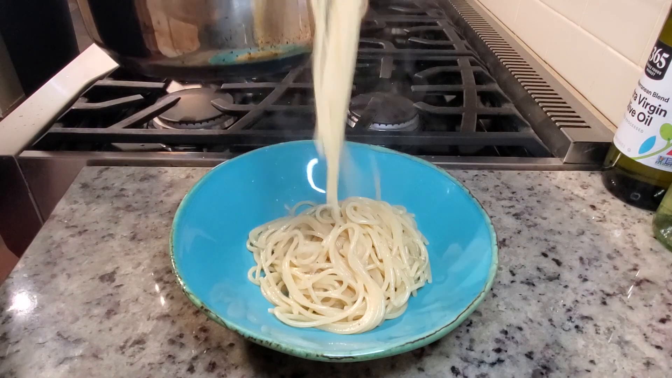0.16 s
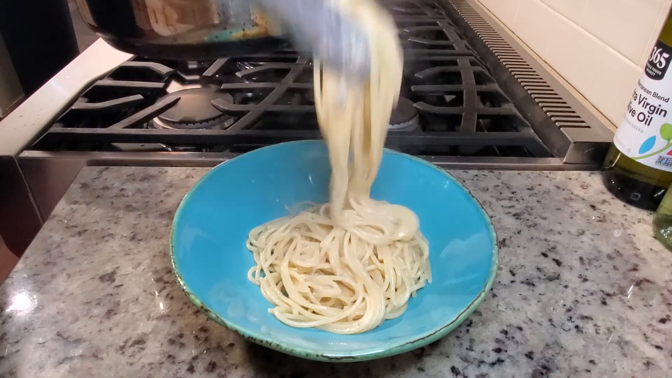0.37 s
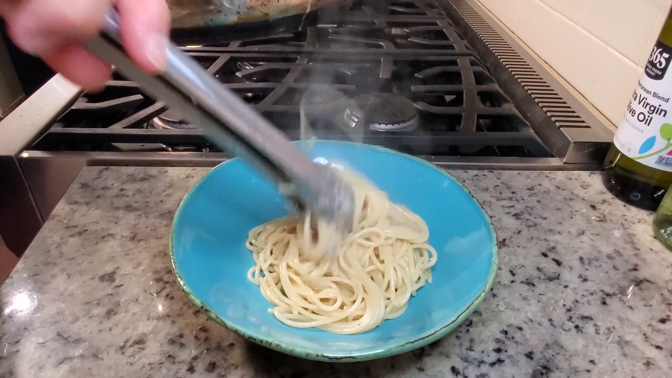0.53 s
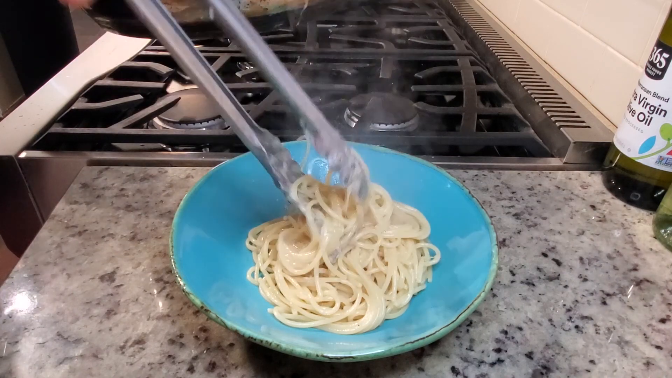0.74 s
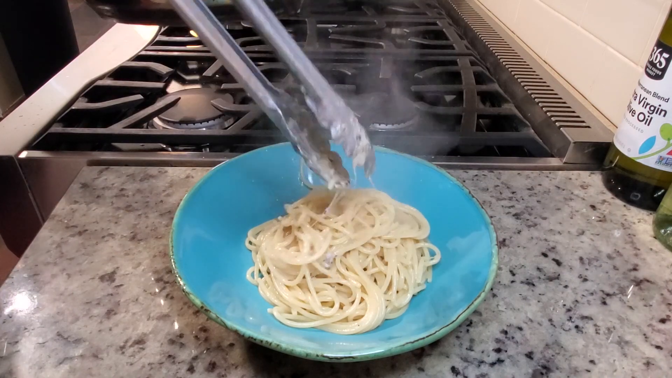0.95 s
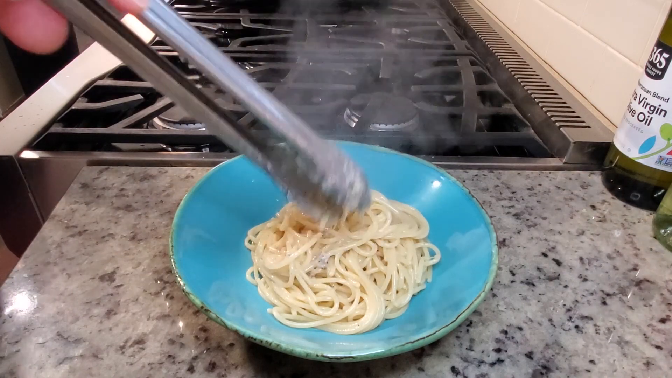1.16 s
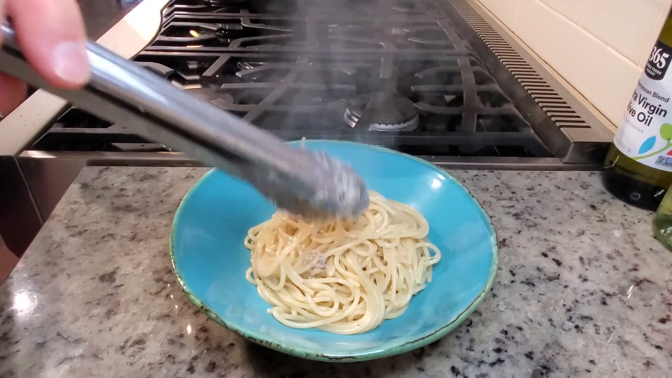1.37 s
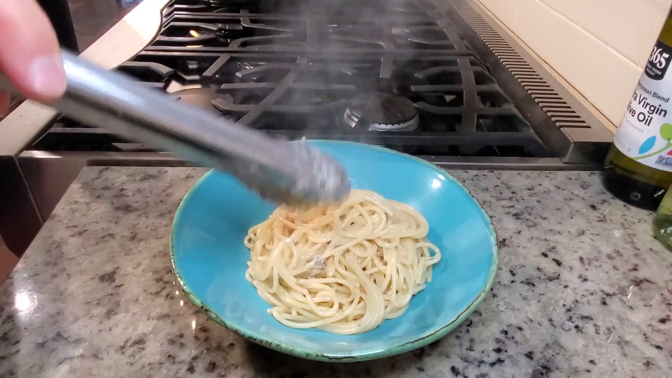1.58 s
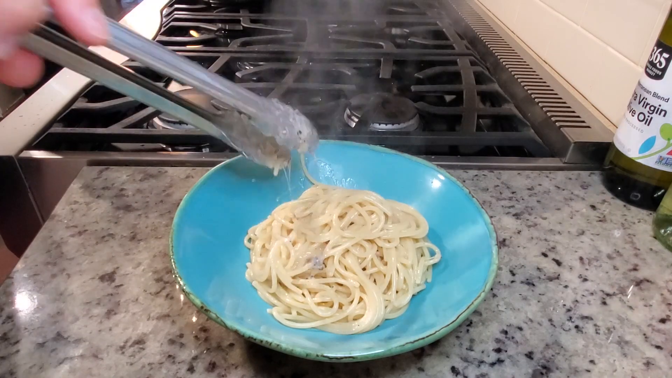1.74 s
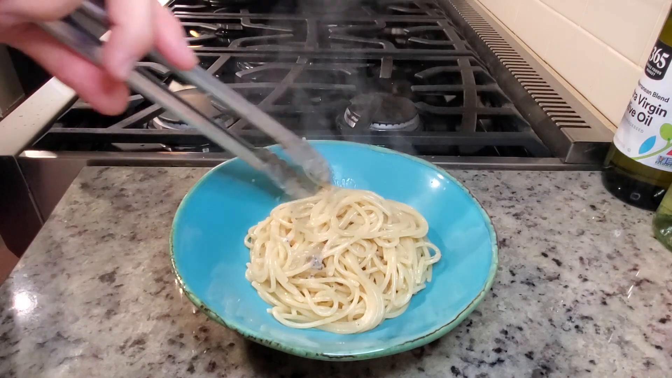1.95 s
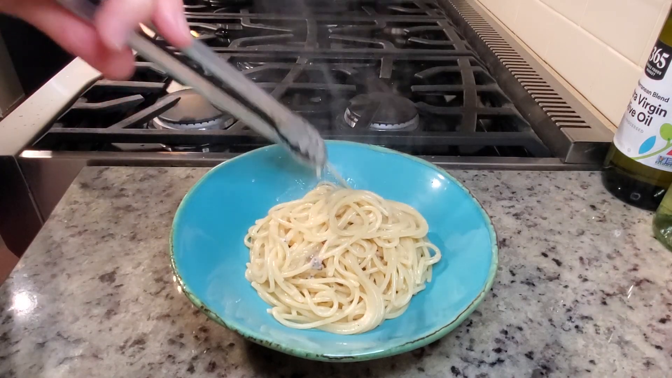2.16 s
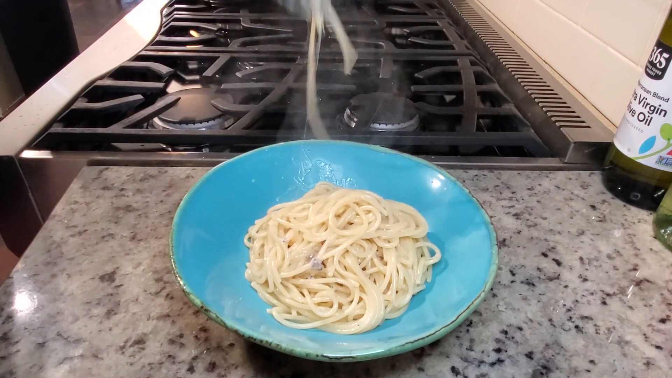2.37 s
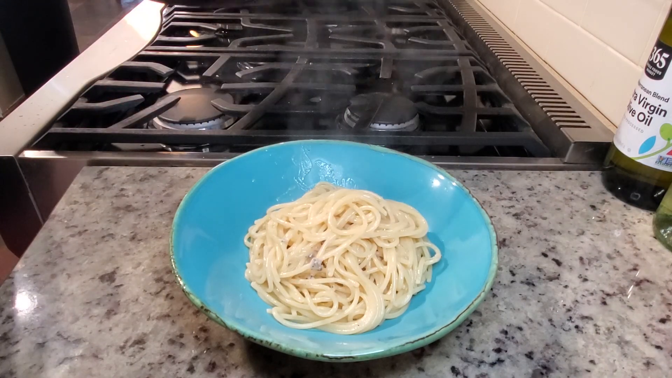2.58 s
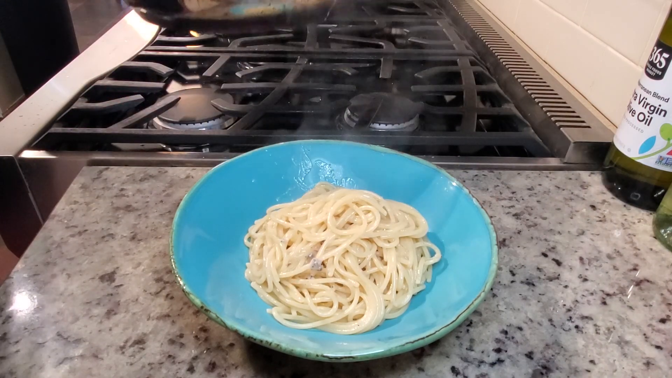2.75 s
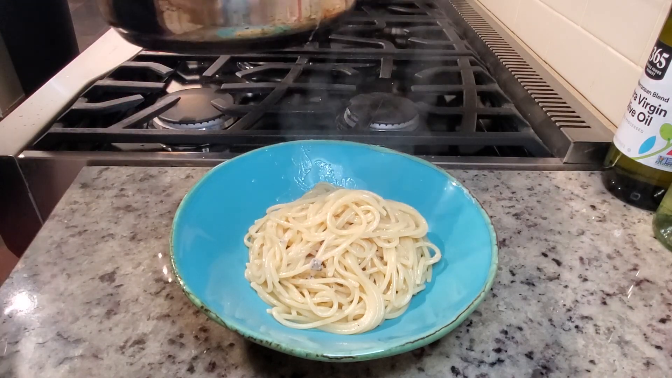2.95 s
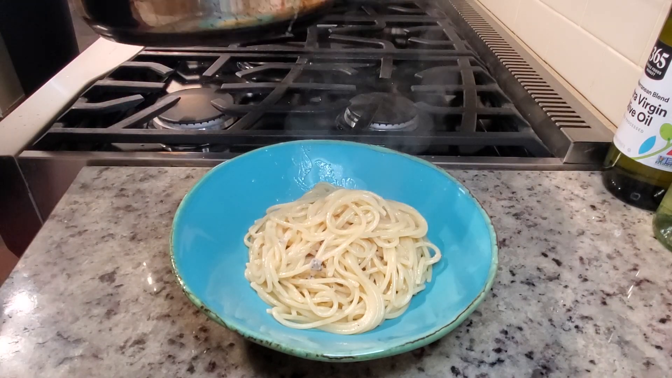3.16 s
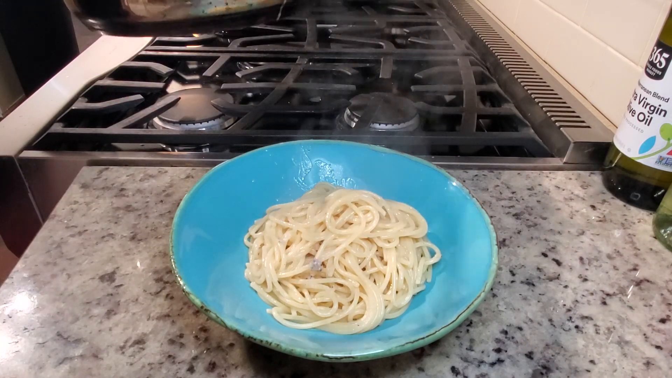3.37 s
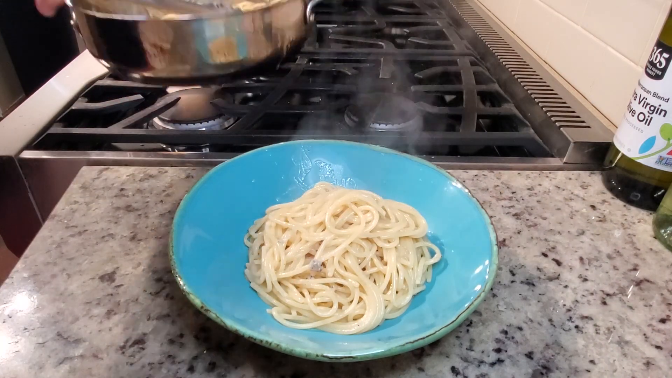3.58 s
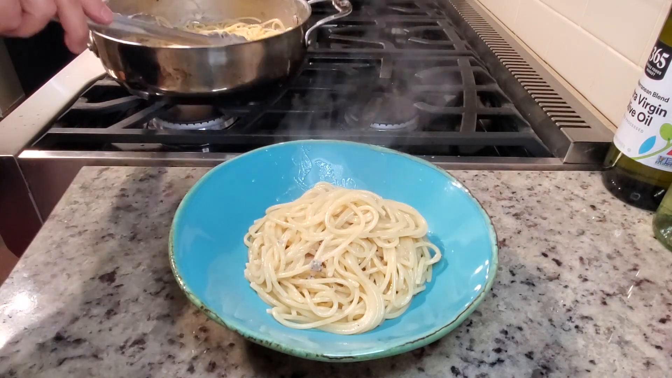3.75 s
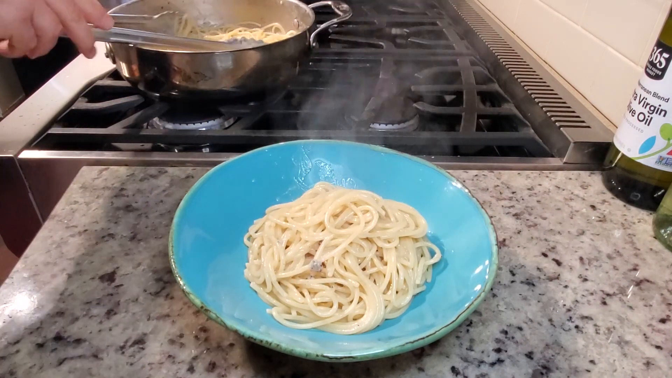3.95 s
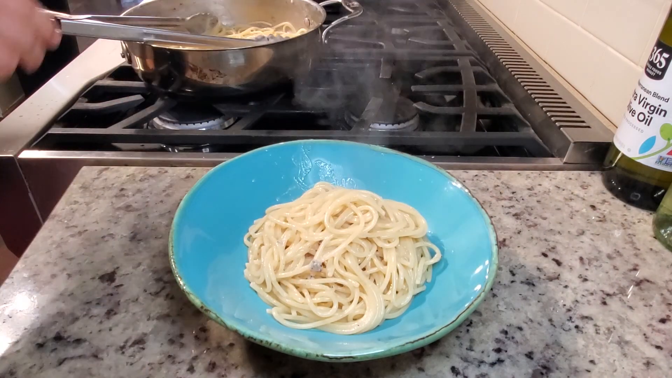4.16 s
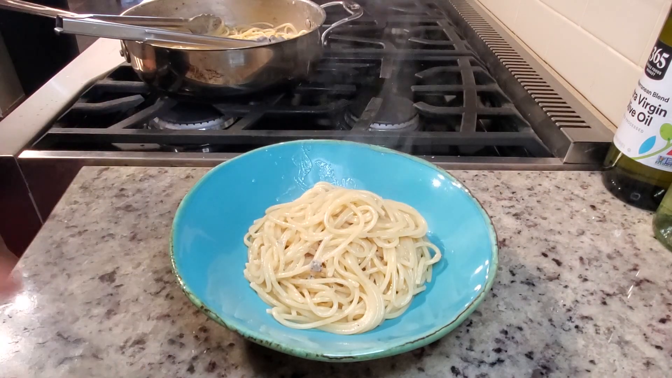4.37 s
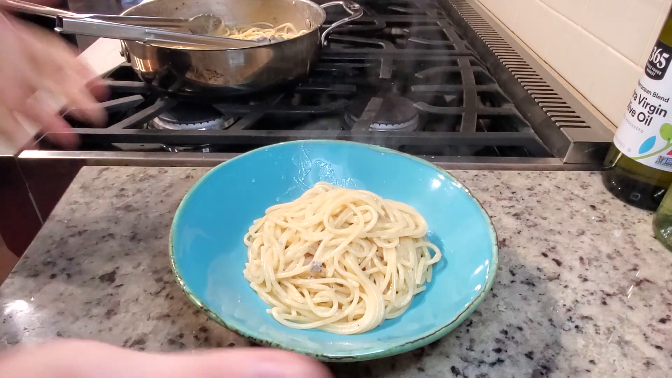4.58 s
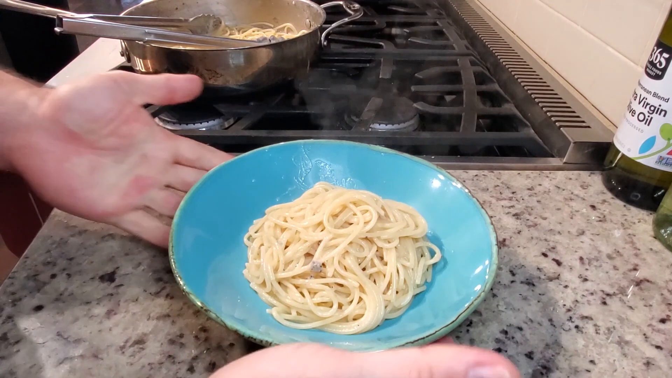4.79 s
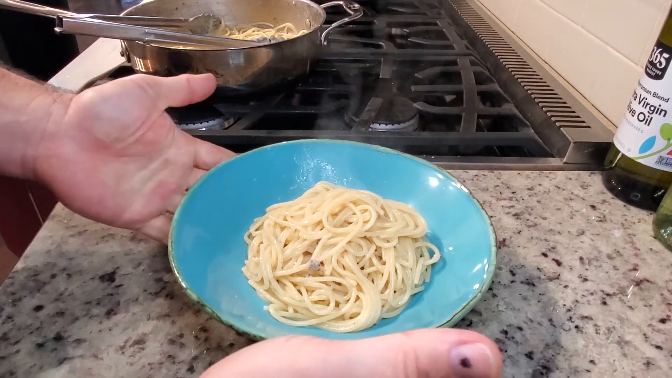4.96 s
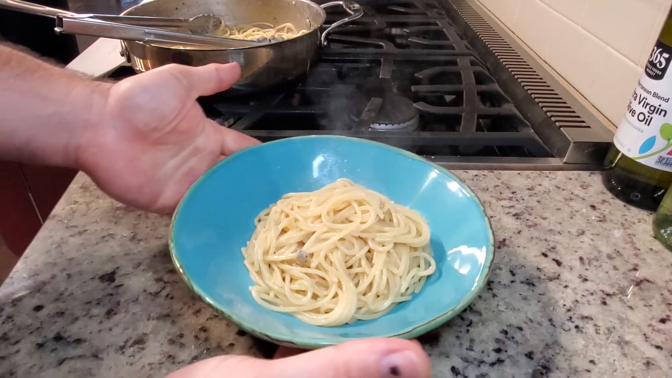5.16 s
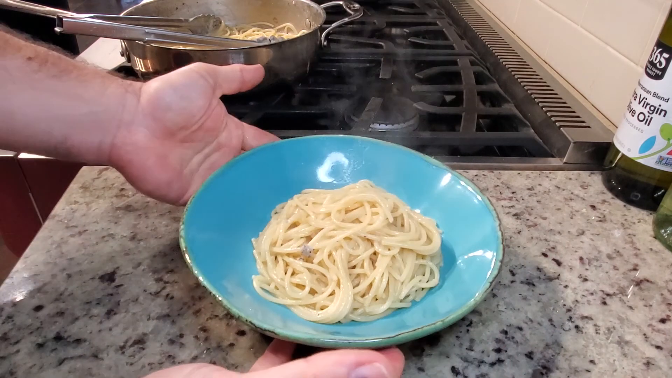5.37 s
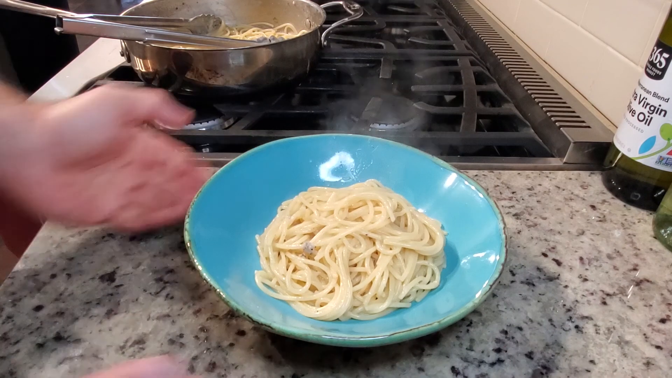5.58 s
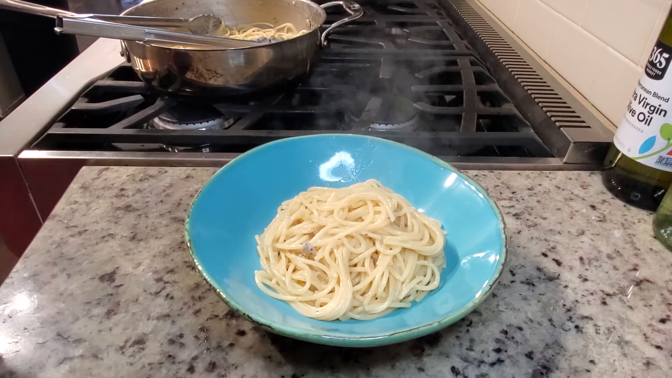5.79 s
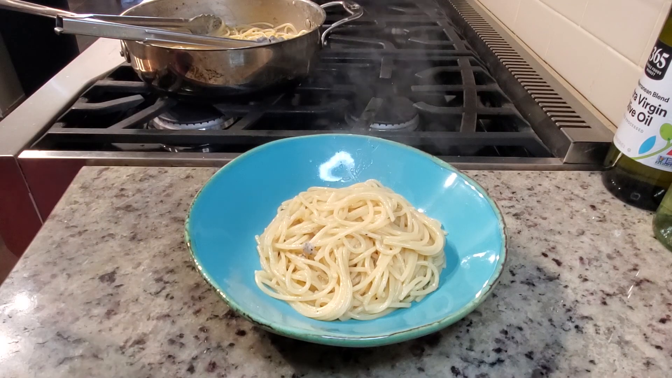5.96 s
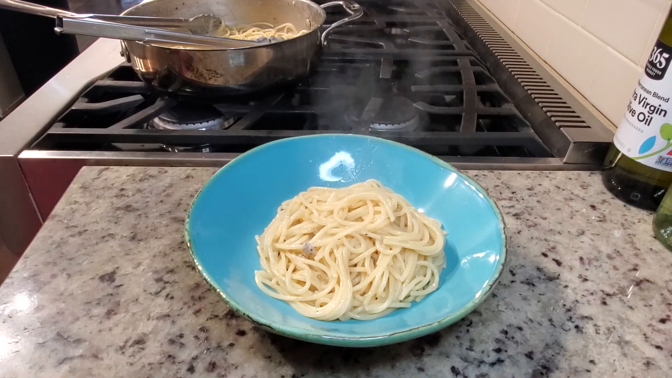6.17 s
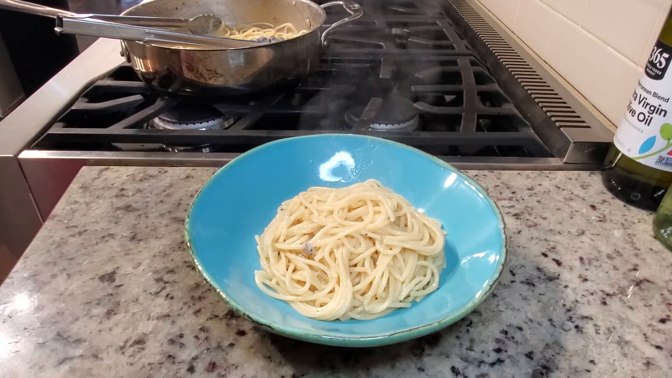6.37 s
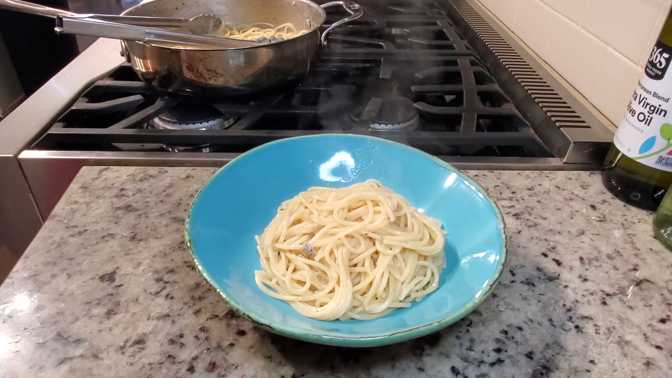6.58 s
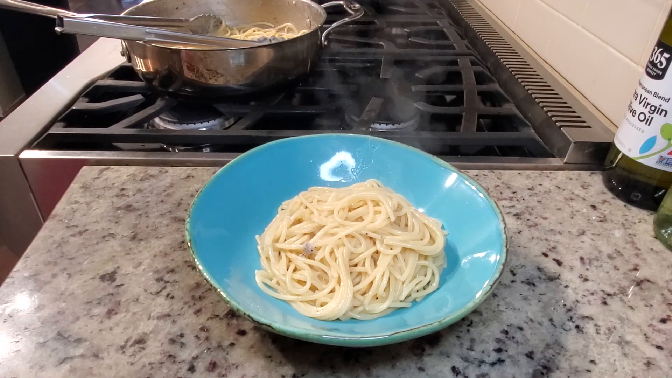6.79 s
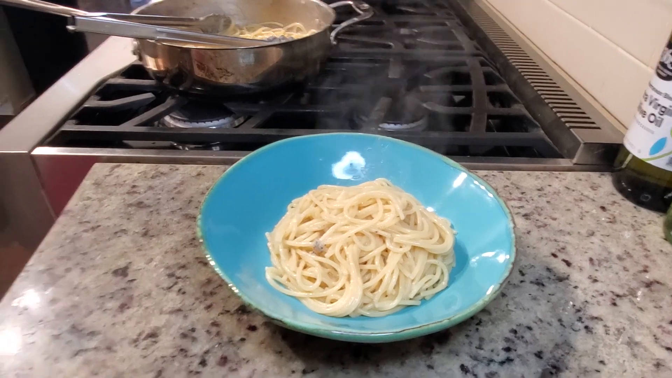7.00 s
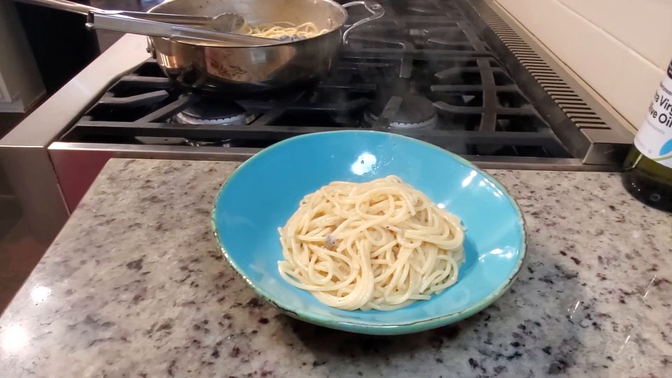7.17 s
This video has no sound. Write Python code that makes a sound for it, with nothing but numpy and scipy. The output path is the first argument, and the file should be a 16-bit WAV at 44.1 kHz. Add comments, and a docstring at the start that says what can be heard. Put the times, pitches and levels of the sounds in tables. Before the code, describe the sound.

A low, airy fan rumble with faint wavering motor tones runs throughout an indoor kitchen with short reverberation. Around 0.4-0.6 s, light metallic ticks and wet strand crackles lead to a soft plop of pasta in a ceramic bowl; faint scuffs follow at 1.3-1.65 s. At 1.9 s tongs touch the bowl dully, hiss briefly on the rim, then at 2.03 s strike a bright, beating ceramic chime that dies quickly. Only hum remains until 3.4 s, when tongs drop into a steel skillet with a sharp clank at 3.49 s and smaller rattles at 3.7-3.8 s. From 3.85 to 4.1 s the skillet clangs and rocks onto an iron grate, crunchy and booming, with dull settling thumps until 4.25 s. Light knocks at 4.9 s precede a gritty, resonant bowl scrape, 5.0-5.5 s, rising slightly in pitch. Faint hisses, a soft tick at 6.3 s and muffled handling bumps at 6.7-6.95 s finish.

```python
"""Steel tongs serve spaghetti in a kitchen: they tick, knock on a ceramic bowl and drop into a steel skillet.
Struck bodies sound as sums of decaying modes (the bowl's in beating pairs), contacts as short noise bursts.
The skillet rocks to rest on an iron grate. Wet strands are crackles; the bowl turning on stone is resonant
noise of drifting pitch. Faint soft hisses and bumps come late; a fan hums throughout as noise and tones."""
import sys
import numpy as np
from scipy import signal
from scipy.fft import rfft, irfft, next_fast_len
from scipy.io import wavfile
from scipy.ndimage import map_coordinates

SR = 44100
rng = np.random.default_rng(int(sys.argv[2]) if len(sys.argv) > 2 else 0)


def persist_wave(psi):
    """Save psi, clipped to +-1, as 16-bit WAV."""
    counts = np.round(np.clip(psi, -1, 1) * 32767).astype(np.int16)
    wavfile.write(sys.argv[1], SR, np.atleast_2d(counts).T)


N = 318843  # length in samples
T = np.arange(SR) / SR  # time since a blow, s


def amp(db):
    """Logarithmic scale: decibels to amplitude gain."""
    return 10 ** (np.asarray(db) / 20)


def unit(x):
    """Normalisation: scale to rms 1."""
    return x / np.sqrt(np.mean(x ** 2) + 1e-20)


def along(points, hz):
    """Spectral envelope: (f/Hz, value) points joined on a logarithmic frequency axis."""
    f, v = np.transpose(points)
    return np.interp(np.log(hz + 1), np.log(f + 1), v)


def level(rows):
    """Amplitude envelope: gain per sample from (t/s, level/dB) rows."""
    return amp(np.interp(np.arange(N) / SR, *np.transpose(rows)))


def wobble(rate):
    """Random modulation: a smooth curve through normal deviates, rate knots a second."""
    knots = rng.standard_normal(int(N * rate / SR) + 4)
    return map_coordinates(knots, [np.arange(N) * rate / SR])


def swell(t, start, hold, rise, fall):
    """Exponential growth and decay: gain of a stroke at times t; rise and fall are the times for 20 dB."""
    before = np.maximum(start - t, 0)
    after = np.maximum(t - start - hold, 0)
    return amp(-20 * (before / rise + after / fall))


def filtered(x, response):
    """Linear filtering: the spectrum of x times a response of frequency."""
    m = next_fast_len(len(x) + 8192)
    return irfft(rfft(x, m) * response(np.fft.rfftfreq(m, 1 / SR)), m)[:len(x)]


def noise(colour, size):
    """Coloured noise: rms 1, with spectral level colour(Hz) in dB."""
    return unit(filtered(rng.standard_normal(size), lambda hz: amp(colour(hz))))


def octaves(hz, centre_hz=2500):
    """Logarithmic pitch: distance from a centre in octaves."""
    return np.log2((hz + 1) / centre_hz)


def add(track, s, sound):
    """Superposition: mix a sound into the track at time s."""
    i = round(s * SR)
    track[i:i + len(sound)] += sound[:N - i]


# the kitchen's reverberation time: (f/Hz, t60/s)
KITCHEN_DECAY = [(100, .45), (700, 0.54), (2000, .48), (5000, .39), (8000, 0.35), (14000, .22)]


def room_tail():
    """Diffuse reverberation: the answer to one blow is decaying noise whose treble dies first."""
    hz, t, z = signal.stft(rng.standard_normal(SR), SR, nperseg=256)
    decay = amp(-60 * t / along(KITCHEN_DECAY, hz)[:, None])
    tail = signal.istft(z * decay, SR, nperseg=256)[1][:SR]
    tail = tail * (1 - np.exp(-T / .006))
    return tail / np.linalg.norm(tail)


def in_room(sound, room_db):
    """Convolution: a sound together with its reverberation."""
    return sound + amp(room_db) * signal.fftconvolve(sound, room_tail())[:SR]


CONTACT_S = 0.00017  # time constant with which a contact builds up


def burst(colour, t60, room_db, crack=1):
    """Impact excitation: a sharp crack and dense, short-lived vibration, heard in the room."""
    size = SR // 3
    t = T[:size]
    decay = amp(-60 * t / t60) + crack * amp(-60 * t / 0.016)
    envelope = decay * (1 - np.exp(-t / CONTACT_S))
    return in_room(np.pad(noise(colour, size=size) * envelope, (0, SR - size)), room_db)


def ring(modes, tilt=0, scatter_db=2, cycles=1, blur=0.28, early=0):
    """Modal superposition: modes swell and decay; loose contact blurs phase and damps early wide swings."""
    out = np.zeros(SR)
    for hz, db, t60 in modes:
        drift = blur * np.cumsum(rng.standard_normal(SR)) / 100
        phase = 2 * np.pi * (hz * T + rng.random()) + drift
        fade_db = -60 * T / min(t60, .5)  # no mode outlasts a t60 of 0.5 s
        rise = 1 - np.exp(-T * hz / cycles)
        gain = amp(db + tilt * octaves(hz) + scatter_db * rng.normal() + fade_db)
        out += gain * rise * np.sin(phase)
    return out * (1 + early * np.exp(-T / 0.015))


def tick(centre_hz, width, t60):
    """Band-limited impact: a light contact in one band, width octaves to each side."""
    def band(hz):
        return -10 * np.log10(1 + (octaves(hz, centre_hz) / width) ** 6)
    return amp(-5) * burst(band, t60, room_db=-11.5, crack=0.55)


# relative level of the whole hum: (t/s, level/dB)
FAN_LEVEL = [(0.0, -41), (2.09, -41.5), (2.39, -44.5), (2.96, -45.5), (4.05, -38.5), (4.87, -46),
             (5.78, -41.5), (7.23, -40)]
# spectrum of the moving air: (f/Hz, relative level/dB)
AIR_SPECTRUM = [(20, -33.5), (38, -15), (50, -7), (72, -7), (98, -3.5), (128, -12.5), (180, -11),
                (275, -29.5), (370, -25), (480, -33.5), (620, -42), (1200, -52), (4500, -66.5),
                (15000, -79.5)]
# motor tones: (f/Hz, relative level/dB, wander rate/s^-1)
MOTOR_TONES = [(52, -41.5, 5.5), (95.7, -49.5, 5.6), (145.7, -55, 5.4), (198.4, -51, 2.7), (387, -62, 1.5),
               (471, -69, 4), (591, -88, 0.54), (790, -75.5, 1.6)]


def fan():
    """Broadband flow noise with discrete tones: a rumble of air and wavering motor tones."""
    t = np.arange(N) / SR
    rumble = amp(-2.0) * noise(lambda hz: along(AIR_SPECTRUM, hz), size=N)
    tones = np.zeros(N)
    for hz, db, rate in MOTOR_TONES:
        gain = amp(db + 0.5 * wobble(rate)) * np.sqrt(2)
        tones += gain * np.sin(2 * np.pi * hz * t + 1.2 * wobble(rate))
    strength = unit(level(FAN_LEVEL))
    return strength * (amp(-38.5) * rumble + amp(-1.5) * tones)


# light ticks and scuffs of the tongs and of handling:
# (t/s, relative level/dB, centre f/Hz, width to each side/octaves, t60/s)
LIGHT_TICKS = [(.360, -45.5, 3840, 0.22, .045), (.560, -48, 4500, 0.21, 0.12),
               (.5928, -43.5, 3800, 0.25, 0.032), (1.283, -54, 5200, .55, .07),
               (1.538, -53, 5300, .7, 0.039), (1.643, -59, 5090, .6, 0.075), (5.540, -60, 8050, 0.28, .08),
               (6.208, -66, 6040, .15, 0.2), (6.284, -46.5, 2610, .65, .33), (6.928, -46, 3620, 0.37, 0.1)]


def light_ticks():
    """Band-limited impacts: light ticks and scuffs of the tongs and of handling."""
    out = np.zeros(N)
    for s, db, centre_hz, width, t60 in LIGHT_TICKS:
        add(out, s, amp(db) * tick(centre_hz, width, t60))
    return out


# crackles grow louder until the tongful lands; their level rises 10 dB in the rise, falls 20 dB in the fall
PASTA_LANDS_S, PASTA_RISE_S, PASTA_FALL_S, PASTA_DB = .565, 0.11, 0.093, -59
STRANDS_PER_S, STRAND_HZ, STRAND_SPREAD_OCT, STRAND_SCATTER_DB = 90, 4470, 0.37, 1.5
PLOP_DB, PLOP_HZ, PLOP_LEAD_S = -53.5, 1690, 0.021  # the soft landing, just ahead of the bowl's answer
SOFT_RING_DB, SOFT_TILT = -52.5, -0.5  # tilt in dB per octave


def pasta(count=2):
    """Granular impacts: strands crackle off the tongs; the plop wakes only the bowl's lowest modes."""
    out = np.zeros(N)
    length = PASTA_RISE_S + PASTA_FALL_S
    times = PASTA_LANDS_S - PASTA_RISE_S + np.arange(0, length, 1 / STRANDS_PER_S)
    for s, (late, size, pitch) in zip(times, rng.standard_normal((len(times), 3))):
        stroke = swell(s, PASTA_LANDS_S, 0, 2 * PASTA_RISE_S, PASTA_FALL_S)
        gain = amp(PASTA_DB + STRAND_SCATTER_DB * size) * stroke
        centre_hz = STRAND_HZ * 2 ** (STRAND_SPREAD_OCT * pitch)
        add(out, s + 0.33 * late / STRANDS_PER_S, gain * tick(centre_hz, width=0.24, t60=0.059))
    add(out, PASTA_LANDS_S - PLOP_LEAD_S, amp(PLOP_DB) * tick(PLOP_HZ, width=1.0, t60=0.24))
    low_modes = [mode[:3] for mode in BOWL_MODES[:count]]
    add(out, PASTA_LANDS_S, amp(SOFT_RING_DB) * ring(low_modes, SOFT_TILT, cycles=6))
    return out


# the bowl's paired modes: (f/Hz, relative level/dB, t60/s, split/Hz, share of the partner)
BOWL_MODES = [(791, -17, .3, 14, .4), (1313, -6, .45, 22, .7), (2071, 0, .5, 6.2, -.8),
              (3001, -5, .5, 9, .35), (4085, -2, .42, 12, .7), (5120, -23, .3, 20, .4),
              (5383, -20, .3, 25, .4), (6331, -27, .32, 11, .4), (6616, -28, .32, 13, .4),
              (7020, -28, .3, 19, .4), (7510, -25, .32, 17, .4), (8608, -29, .27, 21, .4),
              (10080, -30, .26, 6, .3)]


def bowl_chime():
    """Broken symmetry: the bowl is not quite round, so each mode is a beating pair."""
    chime = np.zeros(SR)
    for hz, db, t60, split, share in BOWL_MODES:
        pair = np.sin(2 * np.pi * hz * T) + share * np.sin(2 * np.pi * (hz + split) * T)
        chime += amp(db - 60 * T / t60) * pair
    return chime


# tongs on the bowl:
# (t/s, relative level/dB, relative ring level/dB, thud level/dB, brightness of the chink/dB per octave)
BOWL_KNOCKS = [(1.9152, -30, -4, 3, -4.5), (2.0324, -13.5, 3, -16, 1.5), (2.037, -22, -29, -16.5, -1.5)]
# steel meeting glaze: (f/Hz, relative level/dB)
CHINK_SPECTRUM = [(200, -15), (550, -19), (780, -0.5), (1050, -10), (1400, -0.5), (2500, -4), (4200, -4.5),
                  (5500, -8), (7500, -16.5), (10000, -30), (12500, -42), (15800, -47)]
# the stone top under the bowl: (f/Hz, relative level/dB, t60/s)
COUNTER_MODES = [(125, -2.5, 0.14), (153, -1, .22), (207.7, -3.5, 0.16), (280, -3.5, 0.11), (374, -4, 0.16),
                 (490, -12, .15), (720, -6, 0.23), (794, -4, 0.15)]


def bowl():
    """Impact and modal response: each blow gives a chink, the bowl's chime and a thud of the counter."""
    out = np.zeros(N)
    chime = bowl_chime()
    for s, db, ring_db, thud_db, tilt in BOWL_KNOCKS:
        chink = burst(lambda hz: along(CHINK_SPECTRUM, hz) + tilt * octaves(hz),
                      t60=0.087, room_db=-8.5, crack=0.92)
        ringing = in_room(chime, room_db=-14)
        thud = ring(COUNTER_MODES, cycles=.6)
        add(out, s, amp(db) * (amp(-0.5) * chink + amp(ring_db - 3) * ringing + amp(thud_db) * thud))
    return out


# the tongs drag on the rim between the knocks; edge is the time for 20 dB
DRAG_S, DRAG_LENGTH_S, DRAG_DB, DRAG_EDGE_S = 1.96, 0.023, -52, .045
# hiss of steel on glaze: (f/Hz, relative level/dB)
DRAG_SPECTRUM = [(1000, -20.5), (4000, -8), (5200, -1), (6200, -7.5), (8700, -10), (11600, -18.5),
                 (12500, -45.5)]


def rim_drag():
    """Sliding friction: steel hisses over the glaze of the rim as modulated noise."""
    hiss = unit(noise(lambda hz: along(DRAG_SPECTRUM, hz), size=N) * amp(2.5 * wobble(150)))
    return amp(DRAG_DB) * hiss * swell(np.arange(N) / SR, DRAG_S, DRAG_LENGTH_S, DRAG_EDGE_S, DRAG_EDGE_S)


# tongs in the skillet: (t/s, relative level/dB, relative ring level/dB, brightness/dB per octave)
TONG_BLOWS = [(3.4212, -34, -4.5, 6), (3.4887, -16.5, -4.5, 1.5), (3.4915, -9.5, -6.5, -0.5),
              (3.712, -23.5, -3.5, 0), (3.72, -27, 0.5, 1), (3.8122, -39.5, 5, 2)]
# the skillet with the tongs in it: (f/Hz, relative level/dB, t60/s before the cap in ring)
SKILLET_MODES = [(298.2, -9, 0.95), (487, -18.5, 0.55), (970, -10.5, .25), (1110, -6.5, 0.11),
                 (1738, -11, .52), (1830, -15, 0.3), (2036, -18, 0.15), (2500, -26, 0.44),
                 (2589, -17.5, .35), (2675, -12.5, 0.18), (3680, -17, .25), (3966, -14, 0.35),
                 (3877, -16, 0.2), (4770, -14, .2), (5050, -14.5, 0.25), (5400, -22, .37),
                 (5997, -18, 0.44), (6684, -18, 0.44), (7570, -25.5, 0.5), (8530, -23, 0.13),
                 (9390, -24, 0.18)]
# the tongs' dense rattle: (f/Hz, relative level/dB)
CLATTER_SPECTRUM = [(150, -19), (300, -15), (520, -16), (660, -20.5), (1100, -14.5), (1300, -16.5),
                    (1800, 1), (2600, -4.5), (3200, -10.5), (3850, -3), (4300, -9), (6500, -13),
                    (10000, -24), (15800, -34)]
# the singing arms of the tongs: (f/Hz, relative level/dB)
SHIMMER_SPECTRUM = [(600, -21), (1500, -2.5), (4500, -0.5), (7000, -3), (11000, -12.5), (15000, -32.5)]
SHIMMER_DB, SHIMMER_T60_S = -24, 0.51


def tongs():
    """High modal density: falling tongs rattle and clink; the arms' countless weak modes are decaying noise."""
    out = np.zeros(N)
    for s, db, ring_db, tilt in TONG_BLOWS:
        rattle = burst(lambda hz: along(CLATTER_SPECTRUM, hz) + tilt * octaves(hz),
                       t60=.06, room_db=-9, crack=2)
        clink = ring(SKILLET_MODES, tilt, scatter_db=1.5, cycles=2.5, blur=.5, early=2.5)
        clink = in_room(clink, room_db=-7.0)
        shimmer = noise(lambda hz: along(SHIMMER_SPECTRUM, hz), size=SR)
        shimmer = shimmer * amp(SHIMMER_DB - 60 * T / SHIMMER_T60_S)
        add(out, s, amp(db) * (amp(-5.0) * rattle + shimmer + amp(ring_db - 6) * clink))
    return out


# iron and steel grinding: (f/Hz, relative level/dB)
CRUNCH_SPECTRUM = [(120, -12.5), (250, -3), (450, -2), (750, -6.5), (1350, -5.5), (1800, -0.5),
                   (2700, -9.5), (3800, -4.5), (5000, -9), (7000, -19.5), (10000, -29), (13000, -40),
                   (15800, -53)]
# the pan's base against the iron bars: (f/Hz, relative level/dB, t60/s before the cap in ring)
GRATE_MODES = [(544, -26, 0.44), (794, -10, 0.31), (1114, -14, 0.41), (1567, -12, 0.17), (1710, -18, .33),
               (1720, -14.5, 0.15), (1858, -11.5, 0.55), (1886, -11, 0.42), (2116, -15, 0.095),
               (2445, -20.5, .35), (3070, -23, 0.45), (3330, -16.5, 0.17), (3597, -9, 0.15),
               (3680, -12, 0.25), (3840, -17, 0.36), (3900, -20, .25), (4440, -21.5, 0.58),
               (4780, -23.5, .3), (5460, -22.5, 0.18), (6652, -27.5, 0.6), (7500, -34.5, .18)]
# the cooktop's body: (f/Hz, relative level/dB, t60/s before the cap in ring)
STOVE_MODES = [(100.7, -16.5, 0.31), (165.5, -12, 0.57), (197.4, -6.5, 0.49), (213.1, -2, 0.23),
               (347, -19, .3)]


def grate_contact(ring_db, thud_db, tilt):
    """Coupled bodies: one contact of pan and grate gives a crunch, a clang and the boom of the cooktop."""
    crunch = burst(lambda hz: along(CRUNCH_SPECTRUM, hz) + tilt * octaves(hz),
                   t60=0.12, room_db=-3.5, crack=0.45)
    clang = in_room(ring(GRATE_MODES, tilt, scatter_db=5.0, blur=.9, early=2.6), room_db=-8.5)
    boom = ring(STOVE_MODES, scatter_db=1.5, cycles=.8, blur=.45)
    return amp(-3) * crunch + amp(ring_db - 9.0) * clang + amp(thud_db + 2.0) * boom


# the skillet's edge strikes the grate and rebounds once:
# (t/s, relative level/dB, relative ring level/dB, brightness/dB per octave)
EDGE_BLOWS = [(3.8482, -15, 10, 1.5), (4.03, -29, 1.5, -1.5), (4.0523, -21.5, 4.5, -0.5)]
EDGE_THUD_DB, REBOUND_S, REBOUND_LOSS_DB = -10.5, 0.0056, 2.5
# the rebound rings less and is duller (tilt in dB per octave)
REBOUND_DAMPING_DB, REBOUND_THUD_DB, REBOUND_TILT = 8, 0.5, -1
# the base slaps flat and rocks: (t/s, relative level/dB, time between rocks/s, brightness/dB per octave)
FLAT_LANDINGS = [(3.903, -12.5, .0098, 0.2), (4.0651, -14, .015, -0.74)]
FLAT_RING_DB, FLAT_THUD_DB = -4, -2.5
ROCK_LOSS_DB, ROCK_THUD_DB, ROCK_TILT = 4, 3, -0.59  # per rock: weaker, more thud, duller (dB per octave)
# the weight settles with dull thumps: (t/s, relative level/dB)
SETTLING_THUMPS = [(3.962, -34), (4.170, -38), (4.233, -45)]
SETTLE_RING_DB, SETTLE_THUD_DB = -5.5, 9.5


def skillet(count=4):
    """Repeated impacts with loss: the pan lands edge first and rocks flat; its weight booms in the cooktop."""
    out = np.zeros(N)
    for s, db, ring_db, tilt in EDGE_BLOWS:
        add(out, s, amp(db) * grate_contact(ring_db, EDGE_THUD_DB, tilt))
        rebound = grate_contact(ring_db - REBOUND_DAMPING_DB, REBOUND_THUD_DB, tilt + REBOUND_TILT)
        add(out, s + REBOUND_S, amp(db - REBOUND_LOSS_DB) * rebound)
    for s, db, rock_s, tilt in FLAT_LANDINGS:
        for k in range(count):
            contact = grate_contact(FLAT_RING_DB, FLAT_THUD_DB + k * ROCK_THUD_DB, tilt + k * ROCK_TILT)
            add(out, s + k * rock_s, amp(db - k * ROCK_LOSS_DB) * contact)
    for s, db in SETTLING_THUMPS:
        add(out, s, amp(db) * grate_contact(SETTLE_RING_DB, SETTLE_THUD_DB, tilt=0.59))
    return out


# the bowl knocks lightly on the stone: (t/s, relative level/dB)
BOWL_NUDGES = [(4.881, -44), (4.916, -56)]
NUDGE_HZ, NUDGE_OCT, NUDGE_T60_S = 790, 0.21, 0.1


def nudges():
    """Band-limited impacts: the bowl knocks lightly on the stone."""
    out = np.zeros(N)
    for s, db in BOWL_NUDGES:
        add(out, s, amp(db) * tick(NUDGE_HZ, NUDGE_OCT, NUDGE_T60_S))
    return out


# the bowl's resonances on its foot, before the turn shifts them: (f/Hz, width/Hz, relative level/dB)
FOOT_RESONANCES = [(547, 110, -8), (772, 83, 2.5), (1226, 140, -1.5), (1392, 110, -2.5), (2060, 92, -13.5),
                   (2765, 60, -8), (3940, 110, -5.5), (4400, 450, -15), (5220, 73, -3), (6610, 270, -25),
                   (8050, 180, -30), (9500, 300, -34.5)]
SLIDE_S, SLIDE_LENGTH_S, SLIDE_DB = 4.99, 0.494, -57
SLIDE_STICK_DB = 1  # unevenness of the drag
SLIDE_RISE_S, SLIDE_FALL_S = 0.044, 0.11  # time for 20 dB
TURN_S, TURN_LENGTH_S, TURN_FROM, TURN_TO = 4.98, 0.43, .975, 1.03  # from and to are pitch ratios


def foot_response(f):
    """Resonance: the sum of second-order band-pass responses with alternating sign."""
    total = 0
    for k, (centre, width, db) in enumerate(FOOT_RESONANCES):
        resonance = 1j * f * width / (centre * centre - f * f + 1j * f * width)
        total = total + (-1) ** k * amp(db) * resonance
    return total


def slide():
    """Friction-driven resonance: grit under the foot excites the bowl, whose resonances drift as it turns."""
    t = np.arange(N) / SR
    grit = rng.standard_normal(N) * amp(1.0 * wobble(300) + SLIDE_STICK_DB * wobble(23))
    ratio = np.interp(t, [TURN_S, TURN_S + TURN_LENGTH_S], [TURN_FROM, TURN_TO])
    # reading at a changing speed shifts the pitch
    scrape = map_coordinates(filtered(grit, foot_response), [np.cumsum(ratio)], mode="wrap")
    return amp(SLIDE_DB) * unit(scrape) * swell(t, SLIDE_S, SLIDE_LENGTH_S, SLIDE_RISE_S, SLIDE_FALL_S)


# faint soft hisses: (t/s, relative level/dB)
HISS_SWELLS = [(5.68, -63), (6.40, -66.5)]
# spectrum of the hisses: (f/Hz, relative level/dB)
HISS_SPECTRUM = [(400, -10), (800, -6), (1400, 1), (3000, -13.5), (4500, -2.5), (6000, -14.5), (11000, -22),
                 (15000, -32)]
HISS_RISE_S, HISS_FALL_S = 0.24, .45  # time for 20 dB


def soft_hisses():
    """Amplitude-modulated noise: faint soft hisses swell and fade."""
    t = np.arange(N) / SR
    swells = sum(amp(db) * swell(t, s, 0, HISS_RISE_S, HISS_FALL_S) for s, db in HISS_SWELLS)
    hiss = noise(lambda hz: along(HISS_SPECTRUM, hz), size=N)
    return unit(hiss * amp(1.6 * wobble(58))) * swells


# soft bumps: (t/s, relative level/dB, thud level/dB)
SOFT_BUMPS = [(6.736, -51.5, 13), (6.930, -41.5, 17), (6.952, -50.5, 29.5)]
# spectrum of the contact: (f/Hz, relative level/dB)
BUMP_SPECTRUM = [(100, -13.5), (400, 19), (700, 17), (1300, 11.5), (2000, 0), (5000, -53)]
# the microphone's holder: (f/Hz, relative level/dB, t60/s)
HOLDER_MODES = [(140, -7, 0.086), (191, 2.5, 0.071), (248, -0.5, 0.05), (387.6, -20, 0.097)]


def bumps():
    """Impact and modal response: dull contacts set the microphone's holder ringing briefly."""
    out = np.zeros(N)
    for s, db, thud_db in SOFT_BUMPS:
        contact = burst(lambda hz: along(BUMP_SPECTRUM, hz), t60=0.11, room_db=-8, crack=0.24)
        thud = ring(HOLDER_MODES, cycles=0.64)
        add(out, s, amp(db) * (contact + amp(thud_db) * thud))
    return out


def scene():
    """Superposition: everything heard at the counter."""
    serving = light_ticks() + pasta() + bowl() + rim_drag()
    stove = tongs() + skillet()
    late = nudges() + slide() + soft_hisses() + bumps()
    return (fan() + serving + stove + late)[None]


TOP_HZ = 15800  # upper limit of the sound, Hz


def record(dry):
    """Band limiting and saturation: deep bass is thinned, high peaks rounded, nothing sounds above the limit."""
    thinned = signal.sosfilt(signal.butter(3, 30, "highpass", fs=SR, output="sos"), dry[0])
    rounded = thinned / (1 + np.abs(thinned / .97) ** 8) ** (1 / 8)
    return filtered(rounded, lambda hz: hz < TOP_HZ)[None]


dry = scene()
out = record(dry)
persist_wave(out)
```